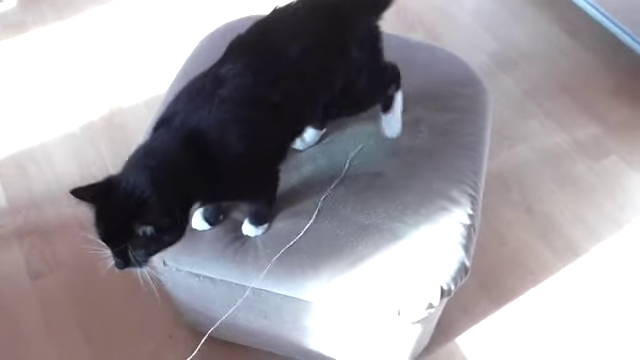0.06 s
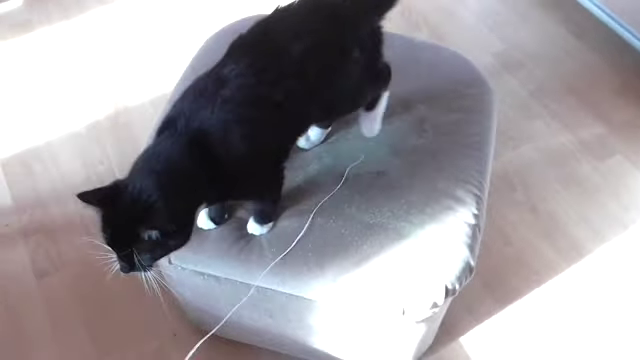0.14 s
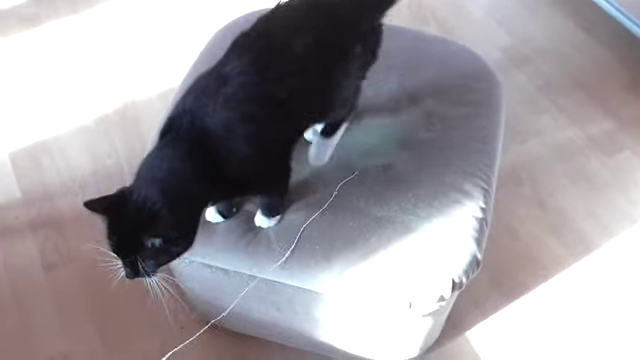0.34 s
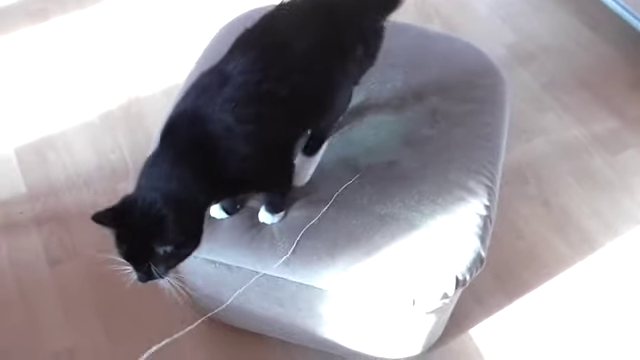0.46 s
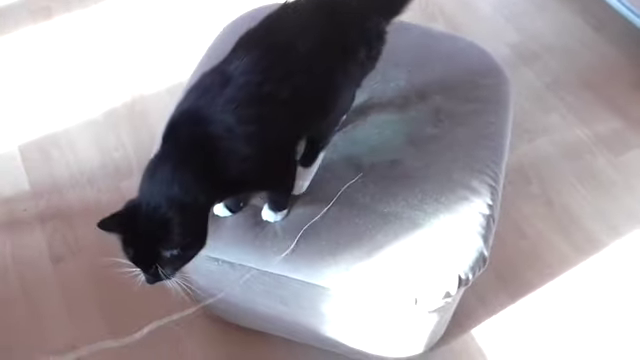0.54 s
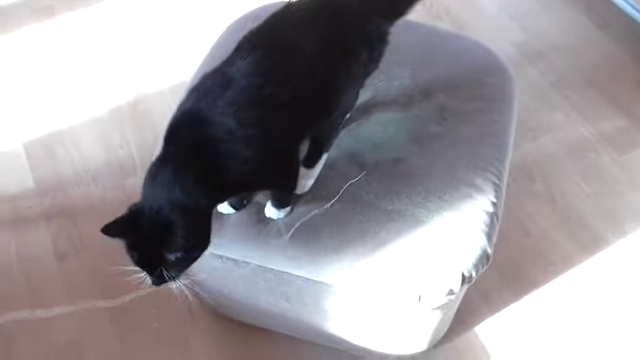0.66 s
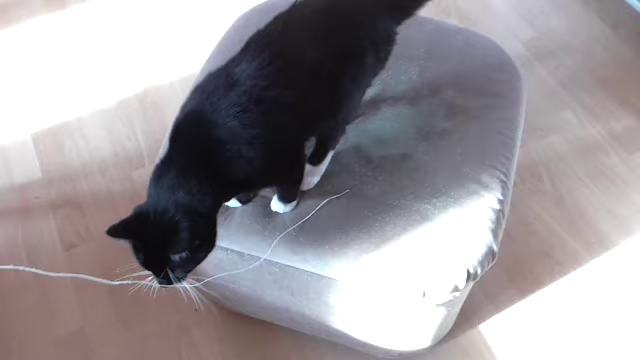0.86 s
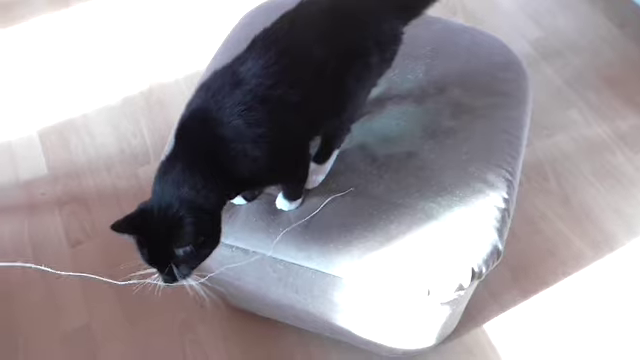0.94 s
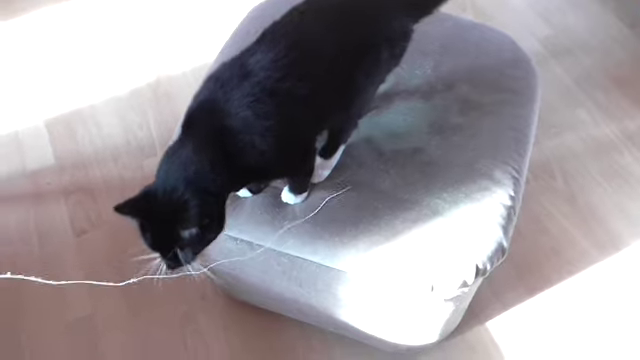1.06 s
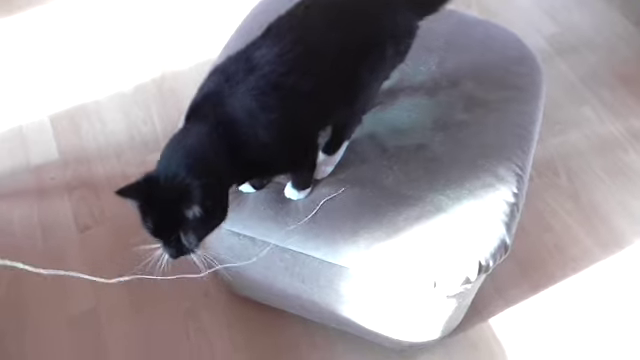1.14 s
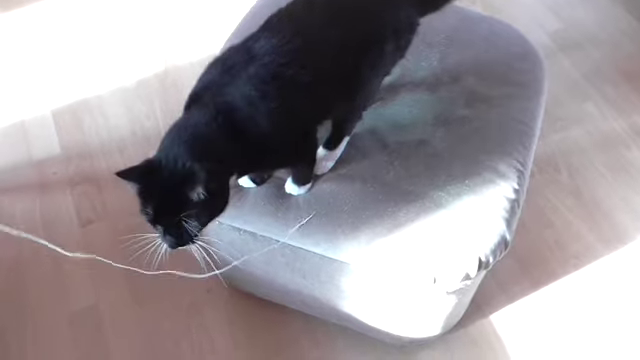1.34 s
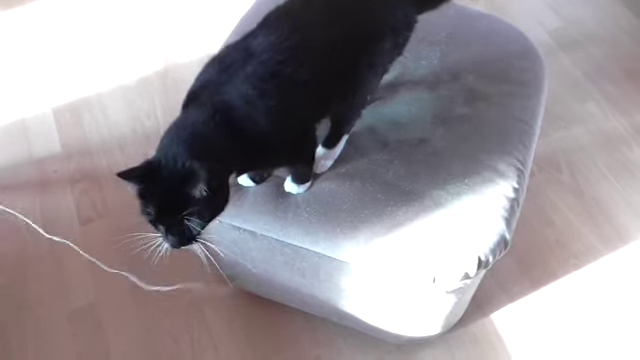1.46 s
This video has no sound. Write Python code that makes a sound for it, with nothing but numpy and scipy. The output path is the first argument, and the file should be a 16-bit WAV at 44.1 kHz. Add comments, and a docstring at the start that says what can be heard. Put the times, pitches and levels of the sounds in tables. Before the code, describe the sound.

One short, bright squeak in a quiet room, then a cat's soft paw thump.

```python
"""One short, bright squeak falls in pitch and rings on in a quiet living room.
It comes as a cat steps about on an upholstered stool close by: friction catches and slips, giving a
nearly pure tone with a raspy edge. A paw thumps softly, the cushion rumbles under the shifting weight,
and a few light taps follow. Faint rustling grows over a low wavering hum and a steady hiss."""
import sys
import numpy as np
from scipy import signal
from scipy.fft import rfft, irfft
from scipy.io import wavfile

SR = 44100
rng = np.random.default_rng(int(sys.argv[2]) if len(sys.argv) > 2 else 0)


def wrap_up_sound(samples):
    """Save the sound to the file named by the first command line argument, as 16-bit audio."""
    columns = np.atleast_2d(samples).T
    # keep every value between -1 and 1, then stretch to whole-number steps
    tamed = np.clip(columns, -1, 1)
    steps = np.round(tamed * 32767).astype(np.int16)
    wavfile.write(sys.argv[1], SR, steps)


N = 66150
T = np.arange(N) / SR

# the squeak's glide and envelope: t/s, f/Hz, level/dB re SQUEAK_DB
SQUEAK_GLIDE = [(.241, 1900, -56), (.243, 1920, -38), (.2478, 1890, -39), (.2488, 1790, -29),
                (.255, 1762, -24), (.260, 1745, -26.5), (.267, 1728, -23.5), (.2712, 1685, -32),
                (.277, 1685, -32), (.280, 1725, -25), (.284, 1725, -28), (.288, 1690, -39)]
# its faint overtones: harmonic number, level/dB re the fundamental
SQUEAK_OVERTONES = [(2, -36), (3, -32)]
# early slap off the wall: delay/s, level/dB re the dry squeak, pan left/dB
WALL_SLAP = [(0.0312, -14, 1)]
SQUEAK_DB, SQUEAK_LEFT_DB, SQUEAK_RELEASE_S = -1.5, 1.64, 0.0014
def squeak():
    """A nearly pure friction tone catches, slides down and stops; the walls throw it back."""
    times, hz, db = np.transpose(SQUEAK_GLIDE)
    phase = 2 * np.pi * np.cumsum(np.interp(T, times, hz)) / SR
    wave = np.sin(phase) + sum(amp(d) * np.sin(k * phase) for k, d in SQUEAK_OVERTONES)
    gate = (T > times[0]) * decay(times[-1], SQUEAK_RELEASE_S)
    dry = np.sqrt(2) * wave * amp(SQUEAK_DB + np.interp(T, times, db)) * gate
    slap = sum(amp(d) * pan(left) * np.roll(dry, round(delay * SR)) for delay, d, left in WALL_SLAP)
    return in_room(dry, wet_db=-12.5, left_db=SQUEAK_LEFT_DB) + slap


# ticks as the squeak catches: t/s, level/dB
CATCH_TICKS = [(0.2422, -51), (0.2459, -42.5)]
# their ring: f/Hz, level/dB re the tick, t60/s
CATCH_RING = [(2640, -5, 0.0088), (5090, -4, .016), (5550, -17, 0.0049), (7560, -20, 0.0069)]
# blips around the main tone: centre t/s, half length/s, f/Hz, level/dB, reverb send/dB
SIDE_PARTIALS = [(0.26, 0.013, 1152, -49, -14), (0.279, 0.0115, 1140, -47.5, -7.5),
                 (0.248, 0.0061, 1983, -41.5, -3), (.250, 0.0089, 3035, -51, -10),
                 (0.268, 0.0049, 2962, -50, -4.5), (0.286, 0.0041, 2837, -55.5, 5.5)]
SIDE_WOBBLE_HZ, FRICTION_WET_DB = 25, -2.5
def squeak_edges():
    """Ticks give the squeak its attack; brief unsteady partials flare beside its main tone."""
    ticks = sum(amp(db) * ring(CATCH_RING, s) for s, db in CATCH_TICKS)
    out = in_room(ticks, FRICTION_WET_DB, SQUEAK_LEFT_DB)
    for s, half_s, hz, db, wet_db in SIDE_PARTIALS:
        phase = 2 * np.pi * np.cumsum(hz + SIDE_WOBBLE_HZ * drift(rate_hz=283)) / SR
        partial = amp(db) * np.sqrt(2) * np.sin(phase) * swell_at(s, half_s)
        out += in_room(partial, wet_db, SQUEAK_LEFT_DB)
    return out


# EQ of the broad scrape: f/Hz, relative level/dB
SCRAPE_EQ = [(100, -40), (800, -37.5), (1100, 6), (2000, 5.5), (3200, 0), (4200, -7.5), (6000, -5),
             (7000, -29), (9200, -27), (11000, -43)]
# resonances that the friction excites: f/Hz, bandwidth/Hz, level/dB
RASP_RESONANCES = [(1540, 49, -74), (1679, 30, -41), (2278, 64, -56), (2630, 28, -72.5), (3380, 160, -76.5),
                   (5270, 110, -71), (5705, 250, -60.5), (6220, 130, -67), (7820, 330, -72),
                   (8940, 250, -73.5)]
RASP_START_S, RASP_ATTACK_S, RASP_END_S, RASP_RELEASE_S = 0.2395, 0.002, 0.27, 0.012
SCRAPE_DB, SLIPS_PER_S, SLIP_SPREAD_DB = -50, 2100, 5.5
def rasp():
    """Uneven tiny slips during the squeak excite side resonances and a broad scrape."""
    gate = np.clip((T - RASP_START_S) / RASP_ATTACK_S, 0, 1) ** 2 * decay(RASP_END_S, RASP_RELEASE_S)
    strength = rng.standard_normal(N) * amp(SLIP_SPREAD_DB * rng.standard_normal(N))
    slips = gate * strength * (rng.random(N) < SLIPS_PER_S / SR)
    out = amp(SCRAPE_DB) * unit(colour(slips, SCRAPE_EQ))
    for hz, width_hz, db in RASP_RESONANCES:
        mode = (1 - decay(0, 0.003)) * np.exp(-np.pi * width_hz * T) * np.sin(2 * np.pi * hz * T)
        out += amp(db) * unit(signal.fftconvolve(slips, mode[:4096])[:N])
    out *= np.sqrt(np.mean(gate ** 2))  # the levels apply while the gate is open
    return in_room(out, FRICTION_WET_DB, SQUEAK_LEFT_DB)


# the stool's dull body: f/Hz, level/dB re PAW_DB, t60/s
STOOL_MODES = [(216, -9, 0.14), (285, -9.5, 0.045), (377, -1.5, 0.019), (710, -11, 0.0061)]
# EQ of a claw on fabric: f/Hz, relative level/dB
CLAW_EQ = [(500, -30), (4000, -10), (6200, 1), (8200, -5), (10000, -15), (15000, -25)]
# EQ of the cushion's soft rumble: f/Hz, relative level/dB
CUSHION_EQ = [(25, -20), (55, -6), (110, -2), (140, -3), (200, -30), (600, -39), (5000, -68)]
# the cat shifts its weight: centre t/s, half length/s, level/dB
WEIGHT_SHIFTS = [(.62, .07, -68), (0.794, 0.031, -74.5), (1.204, 0.073, -73.5)]
PAW_S, PAW_DB, PAW_LOW_CUT_HZ = 0.3882, -43.5, 130
CLAW_S, CLAW_DB = 0.3865, -66.5
def paw():
    """A claw brushes the cover, the paw thumps on the stool, then the cushion gives way."""
    low_cut = signal.butter(2, PAW_LOW_CUT_HZ, "high", fs=SR, output="sos")
    thump = amp(PAW_DB) * signal.sosfilt(low_cut, ring(STOOL_MODES, PAW_S))
    claw = amp(CLAW_DB) * unit(colour(rng.standard_normal(N), CLAW_EQ)) * swell_at(CLAW_S, half_s=0.007)
    cushion = diffuse(CUSHION_EQ) * sum(amp(db) * swell_at(s, half_s) for s, half_s, db in WEIGHT_SHIFTS)
    return in_room(thump + claw, wet_db=-8, left_db=0.5) + cushion


# light taps: t/s, level/dB, brightness/dB per octave
TAP_HITS = [(1.049, -58, -0.5), (1.3695, -51.5, 0), (1.3847, -47.5, 0), (1.3903, -47, 0), (1.4755, -57, 3)]
# their ring: f/Hz, level/dB re the tap, t60/s
TAP_RING = [(836, -10, .012), (985, -4, .04), (1290, -9, .008), (2060, -7.5, 0.021), (2940, -11, 0.011),
            (4040, -11.5, .01), (5450, -11.5, 0.013)]
SCUFF_DB, SCUFF_DECAY_S = -10, 0.0027
def taps():
    """Small contacts, each a brief softened scuff and a short ring."""
    out = np.zeros(N)
    for s, db, tilt_db in TAP_HITS:
        burst = rng.standard_normal(N) * (T > s) * decay(s, SCUFF_DECAY_S)
        scuff = amp(SCUFF_DB) * signal.lfilter([0.5], [1, -0.5], burst)
        out += amp(db) * (ring(TAP_RING, s, tilt_db) + scuff)
    return in_room(out, wet_db=-5, left_db=-0.5)


# EQ of the rustle: f/Hz, relative level/dB
RUSTLE_EQ = [(40, -12.5), (150, -8), (290, 7.5), (400, 0.5), (800, -1), (1250, 1.5), (1800, -11.5),
             (2250, -16.5), (2700, -19), (4200, -13), (5600, -18.5), (7000, -24), (15000, -29)]
# its fader ride: t/s, level/dB
RUSTLE_RIDE = [(0, -61), (.15, -63), (.35, -60), (.47, -63.5), (.6, -76), (.8, -70), (.95, -66),
               (1.06, -61.5), (1.17, -62), (1.3, -61), (1.39, -59.5), (1.44, -62.5), (1.5, -57)]
RUSTLE_GRAIN_DB = 0.5
def rustle():
    """Faint grainy rubbing that sinks after the paw lands and grows again with the movement."""
    return diffuse(RUSTLE_EQ) * level(RUSTLE_RIDE) * amp(RUSTLE_GRAIN_DB * drift(rate_hz=105))


# the low hum's wavering: t/s, level/dB
HUM_RIDE = [(0, -61), (.07, -81), (.16, -67), (.23, -66), (.45, -69.5), (.65, -94), (.73, -63), (.83, -68),
            (.93, -79.5), (.99, -59), (1.09, -68.5), (1.2, -60.5), (1.32, -73), (1.41, -62.5), (1.5, -66.5)]
# steady appliance tones: f/Hz, level/dB, wander/Hz, right-channel lag/rad
APPLIANCE_TONES = [(244.5, -73.5, 1.36, 0.72), (690, -70.5, 0.9, 1.5), (7790, -86.5, 0.81, .5)]
def hum():
    """A low hum swells and fades among thin, steady appliance tones."""
    low = tone(hz=199.07, wander_hz=2.52, lag_rad=0.46) * level(HUM_RIDE) * pan(left_db=1.5)
    return low + sum(amp(db) * tone(hz, wander, lag) for hz, db, wander, lag in APPLIANCE_TONES)


# EQ of the room tone: f/Hz, relative level/dB
AIR_EQ = [(20, -1), (55, 5), (110, 5.5), (170, 10.5), (290, 9), (380, 3), (640, 6.5), (850, 2), (1250, 1),
          (1800, -2.5), (2270, -1), (2550, -13.5), (3200, -13.5), (4200, -10.5), (6500, -13.5),
          (12000, -14), (15500, -16.5)]
AIR_DB = -60.5
def room_air():
    """A steady bed of low air and soft hiss."""
    return amp(AIR_DB) * diffuse(AIR_EQ)


# the living room's decay: f/Hz, t60/s
ROOM_DECAY = [(150, 0.54), (1000, .46), (1750, 0.38), (3000, 0.31), (6000, 0.31), (12000, .2)]
ROOM_BUILD_S, ROOM_CORRELATION, ROOM_LEFT_DB = 0.022, 0.76, 0.5
def in_room(x, wet_db, left_db):
    """Direct sound plus a diffuse tail, at wet_db relative to it, that dies band by band."""
    a, b = rng.standard_normal((2, N))
    hz, t, bands = signal.stft([a, blend(a, b, ROOM_CORRELATION)], SR, nperseg=256)
    bands = bands * amp(-60 * t / read(ROOM_DECAY, hz)[:, None])
    tail = signal.istft(bands, SR, nperseg=256)[1][:, :N]
    tail *= np.clip(T / ROOM_BUILD_S, 0, 1) ** 4
    wet = np.array([unit(signal.fftconvolve(x, side)[:N]) for side in tail])
    return x * pan(left_db) + wet * x.std() * amp(wet_db) * pan(ROOM_LEFT_DB)


# stereo width of the noise beds: f/Hz, left-right correlation (-1..1)
BED_CORRELATION = [(60, 0.72), (130, 0.36), (290, 0.038), (640, -0.49), (1410, -0.34), (3100, -0.044),
                   (6820, 0.13), (15000, 0.36)]
# their balance: f/Hz, pan left/dB
BED_PAN = [(60, 0.7), (250, 1.4), (500, 0), (1500, 0.1), (8000, 0), (14000, 0.2)]
def diffuse(eq):
    """Coloured noise of rms 1, partly alike in the two channels."""
    a, b = rfft(rng.standard_normal((2, N)))
    hz = np.fft.rfftfreq(N, 1 / SR)
    lean = amp(read(BED_PAN, hz))
    sides = np.array([a * lean, blend(a, b, read(BED_CORRELATION, hz)) / lean])
    return unit(colour(irfft(sides, N), eq))


def blend(a, b, correlation):
    """Mixes two independent noises so that the result correlates with the first."""
    return correlation * a + np.sqrt(1 - correlation ** 2) * b


def ring(modes, s, tilt_db=0):
    """Damped modes struck at time s, tilted by tilt_db per octave around 2 kHz."""
    t = np.maximum(T - s, 0)
    return sum(amp(db + tilt_db * np.log2(hz / 2000) - 60 * t / t60) * np.sin(2 * np.pi * hz * t)
               for hz, db, t60 in modes)


def tone(hz, wander_hz, lag_rad):
    """A wandering sine of rms 1 that reaches the right channel later."""
    phase = 2 * np.pi * (np.cumsum(hz + wander_hz * drift(rate_hz=12)) / SR + rng.random())
    return np.sqrt(2) * np.sin([phase, phase - lag_rad])


def drift(rate_hz):
    """Slow random wander of rms 1."""
    low_pass = np.exp(-(np.fft.rfftfreq(N, 1 / SR) / rate_hz) ** 2)
    return unit(irfft(rfft(rng.standard_normal(N)) * low_pass, N))


def swell_at(s, half_s):
    """A smooth rise and fall around time s."""
    return np.exp(-((T - s) / half_s) ** 2)


def decay(s, tau_s):
    """Holds at 1 until time s, then dies away exponentially."""
    return np.exp(-np.maximum(T - s, 0) / tau_s)


def level(ride):
    """Gain over time from a fader ride."""
    return amp(np.interp(T, *np.transpose(ride)))


def colour(x, eq):
    """Filters by an EQ curve."""
    return irfft(rfft(x) * amp(read(eq, np.fft.rfftfreq(N, 1 / SR))), N)


def read(curve, hz):
    """Reads a curve on a log-frequency axis."""
    freqs, values = np.transpose(curve)
    return np.interp(np.log(hz + 1), np.log(freqs + 1), values)


def pan(left_db):
    """Gains that raise the left and lower the right by left_db."""
    return amp([[left_db], [-left_db]])


def amp(db):
    """Decibels to gain."""
    return 10 ** (np.asarray(db) / 20)


def unit(x):
    """Scales to rms 1."""
    return x / np.sqrt(np.mean(x ** 2) + 1e-20)


def scene():
    """The squeak and the cat's movements over the hum and air of the room."""
    return squeak() + squeak_edges() + rasp() + paw() + taps() + rustle() + hum() + room_air()


HIGH_CUT_HZ = 15650
def record(dry):
    """A steep high cut on the whole mix."""
    high_cut = signal.firwin(801, HIGH_CUT_HZ, window=("kaiser", 9), fs=SR)
    return signal.oaconvolve(dry, high_cut[None], "same")


dry = scene()
out = record(dry)
wrap_up_sound(out)
```